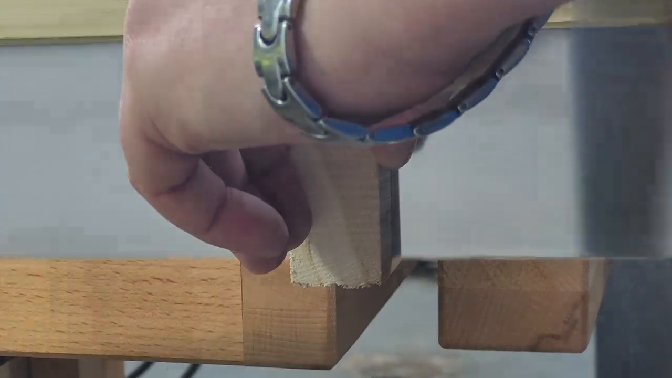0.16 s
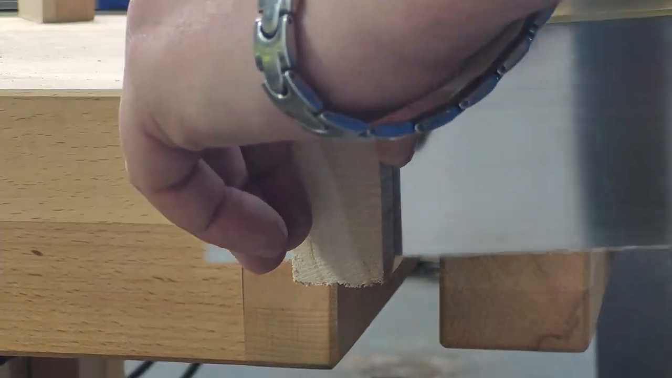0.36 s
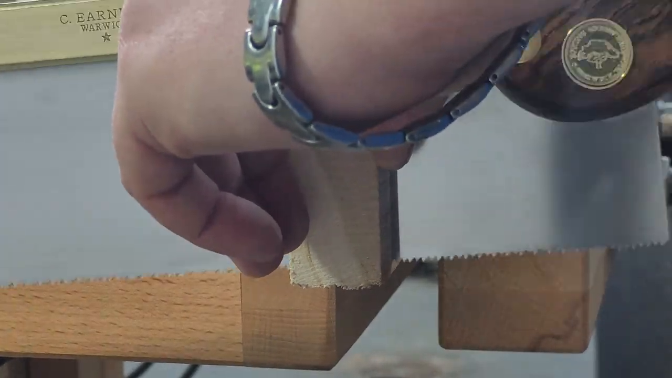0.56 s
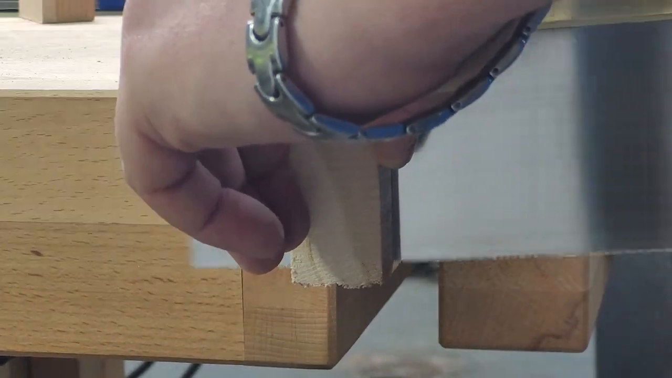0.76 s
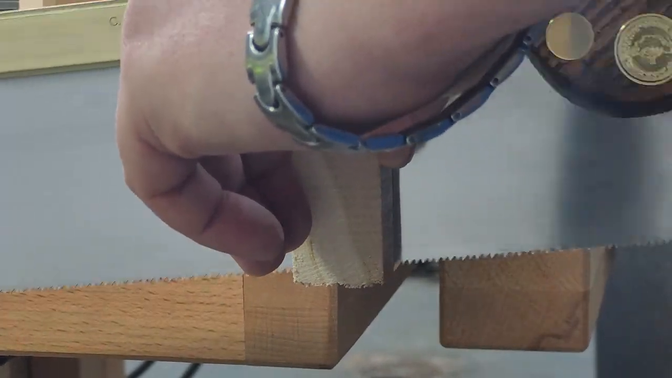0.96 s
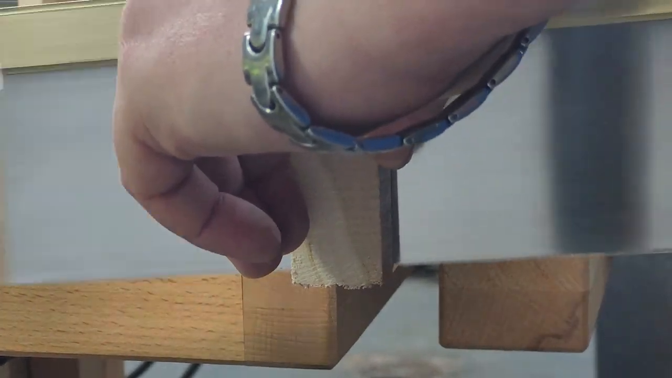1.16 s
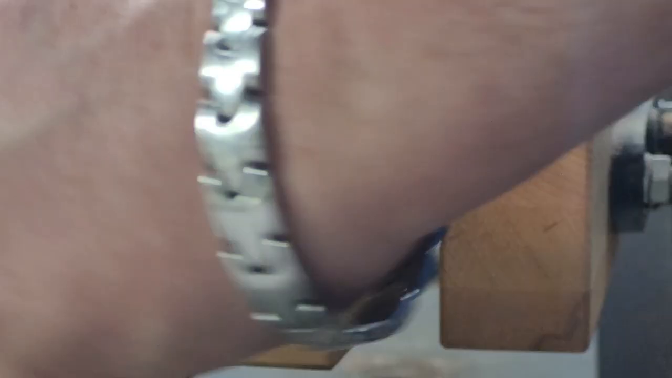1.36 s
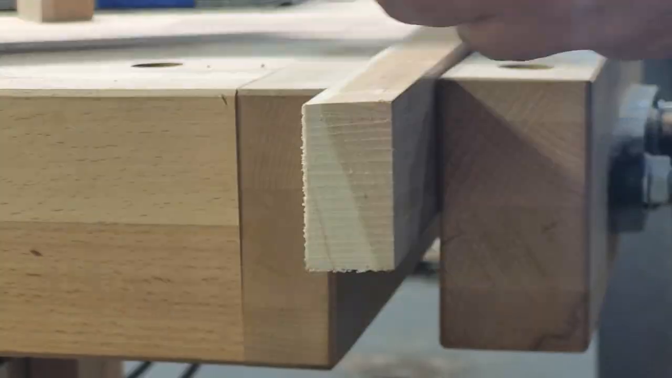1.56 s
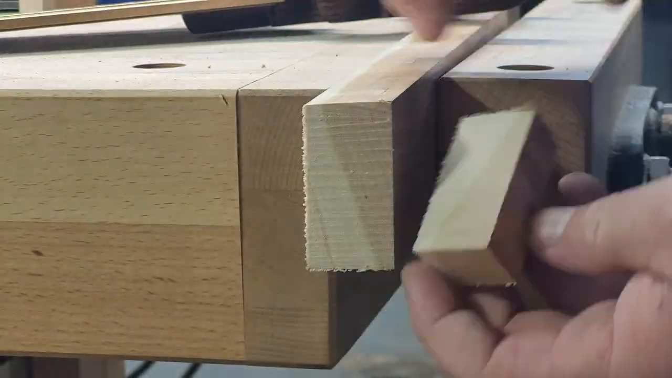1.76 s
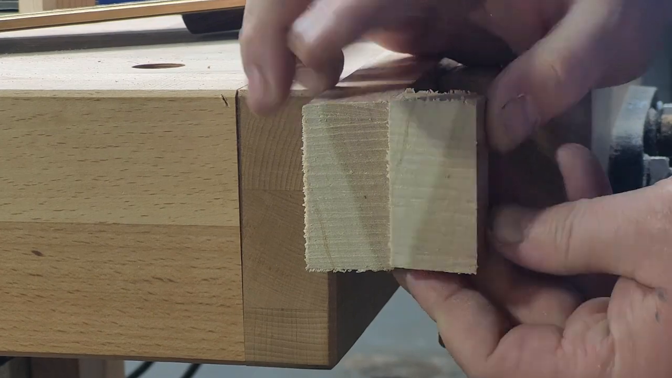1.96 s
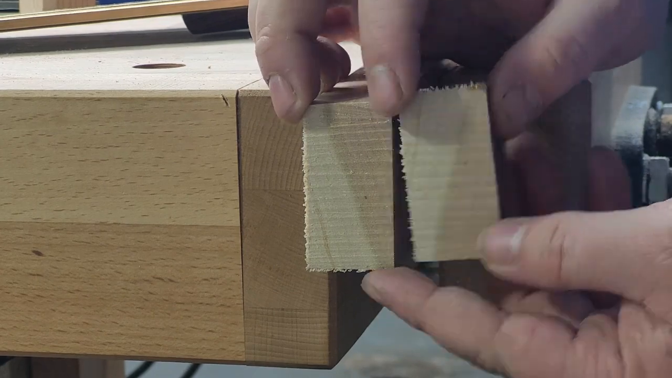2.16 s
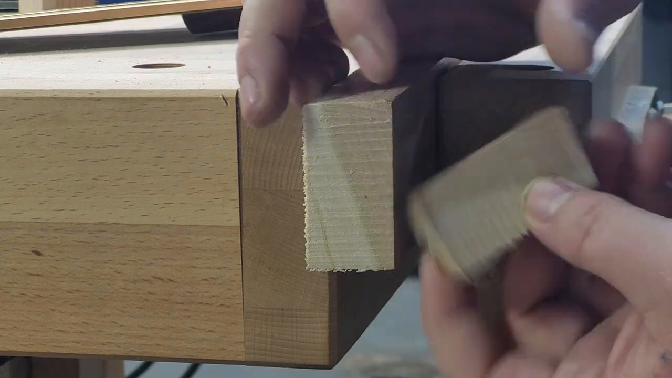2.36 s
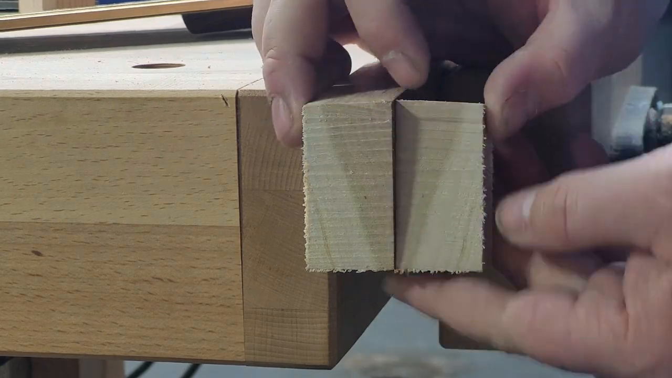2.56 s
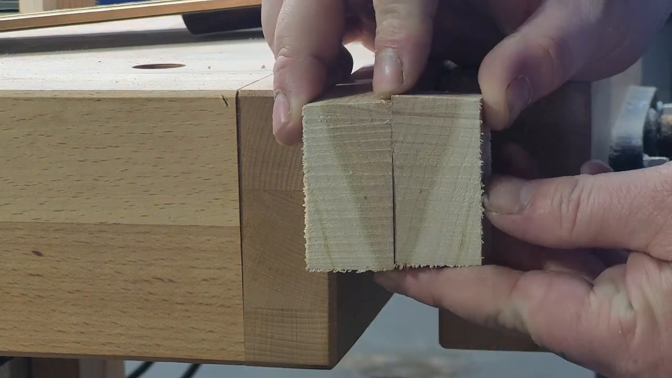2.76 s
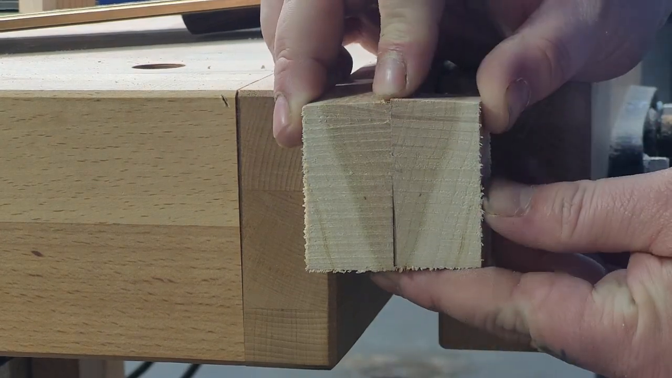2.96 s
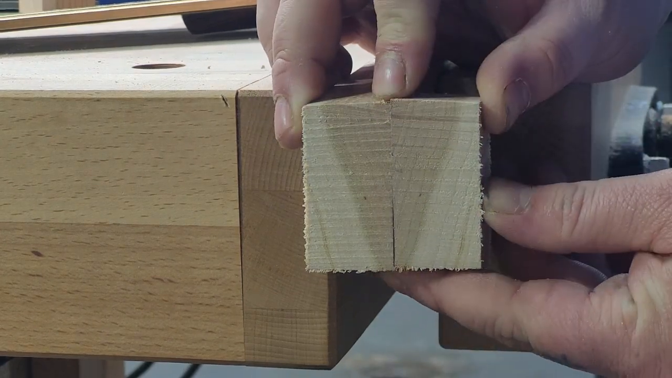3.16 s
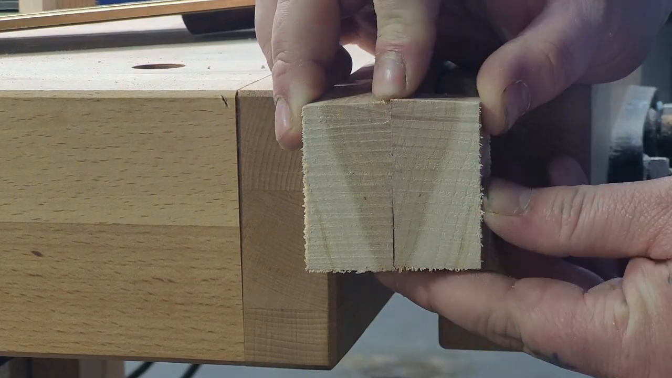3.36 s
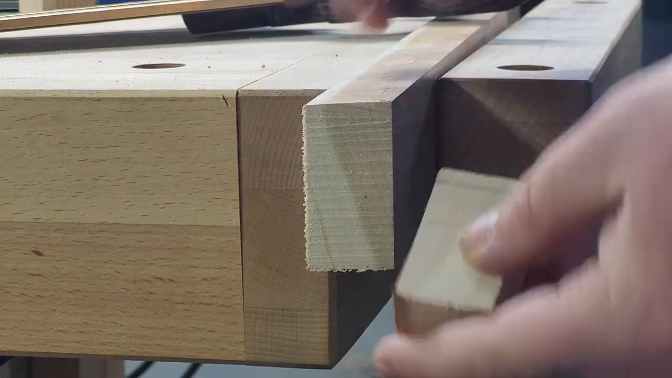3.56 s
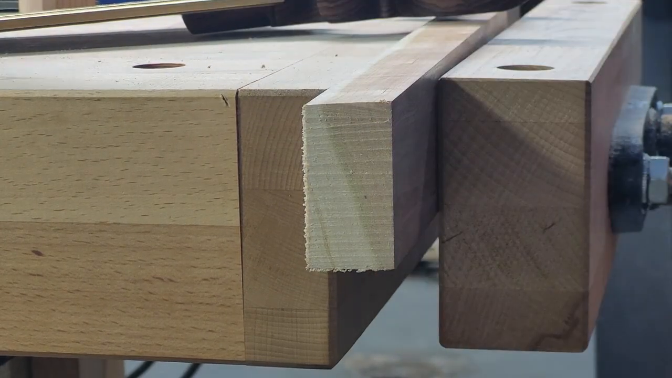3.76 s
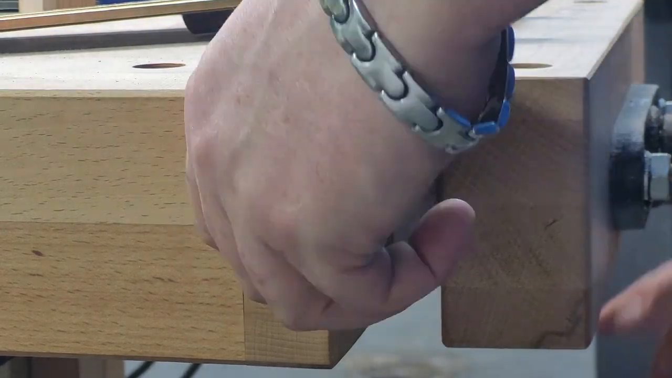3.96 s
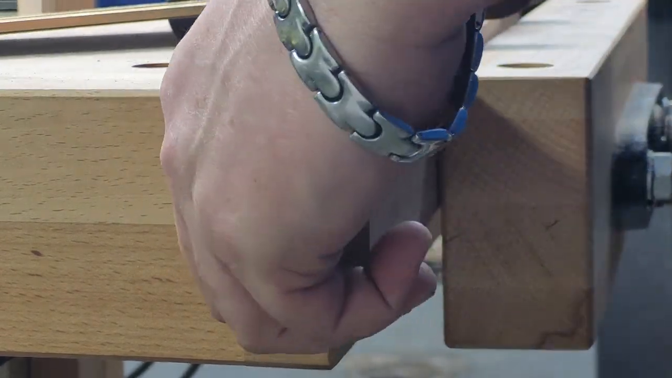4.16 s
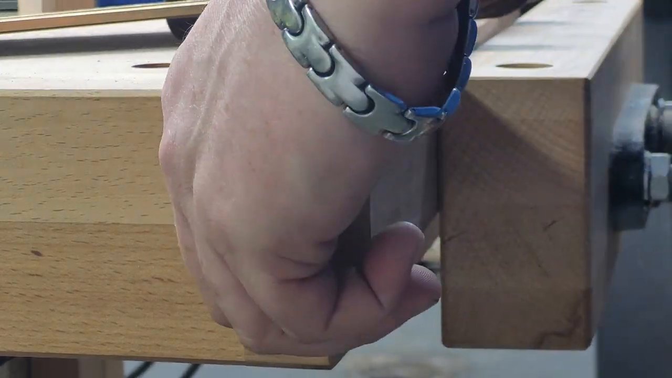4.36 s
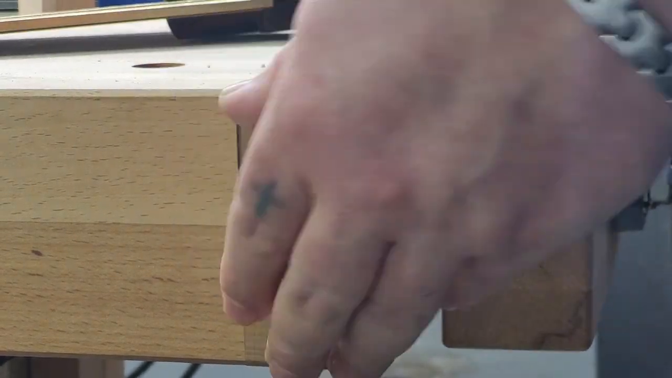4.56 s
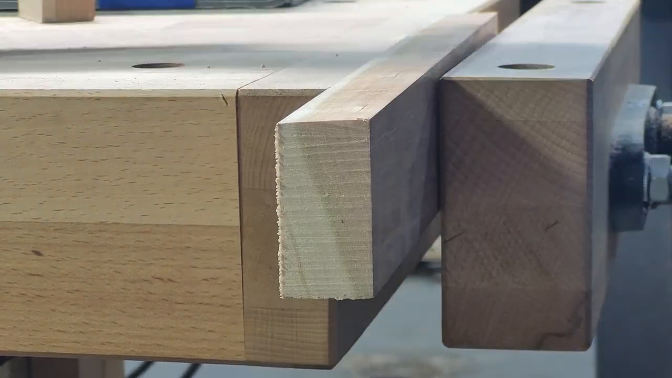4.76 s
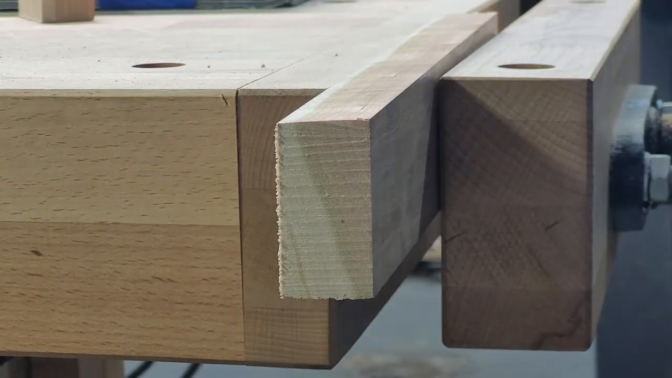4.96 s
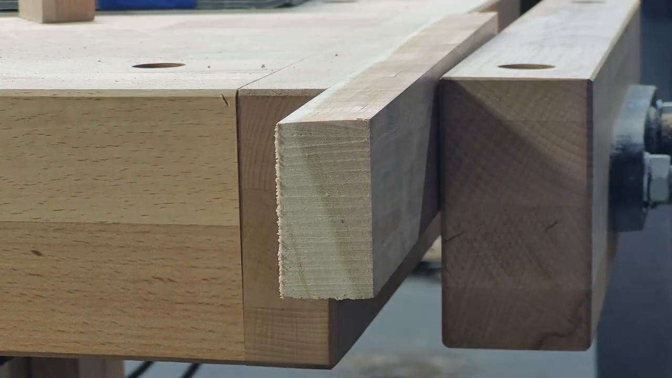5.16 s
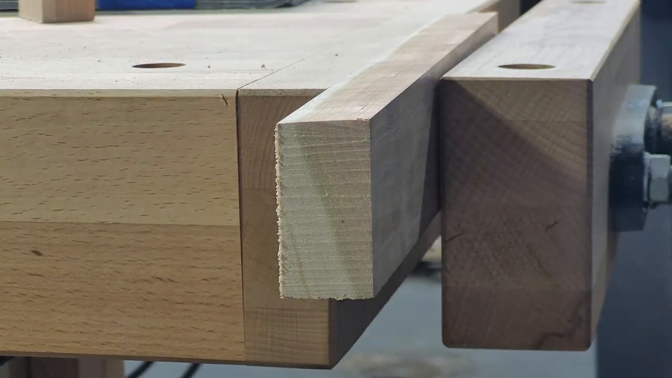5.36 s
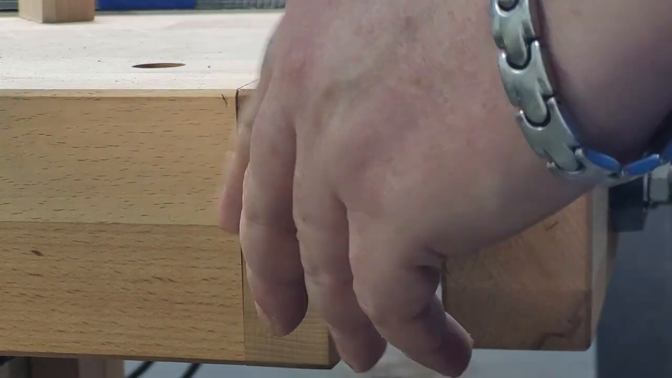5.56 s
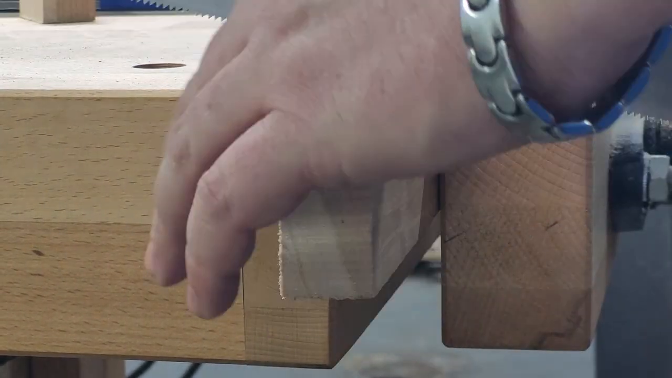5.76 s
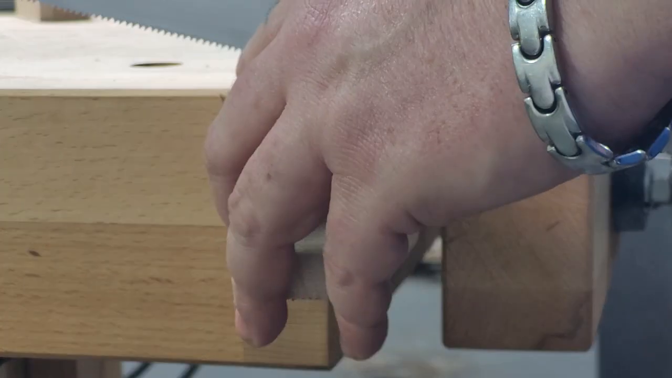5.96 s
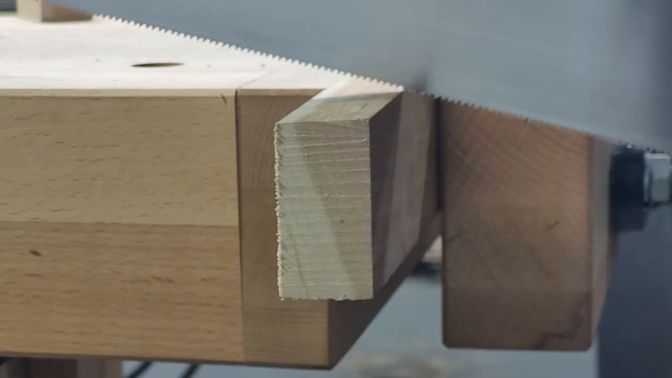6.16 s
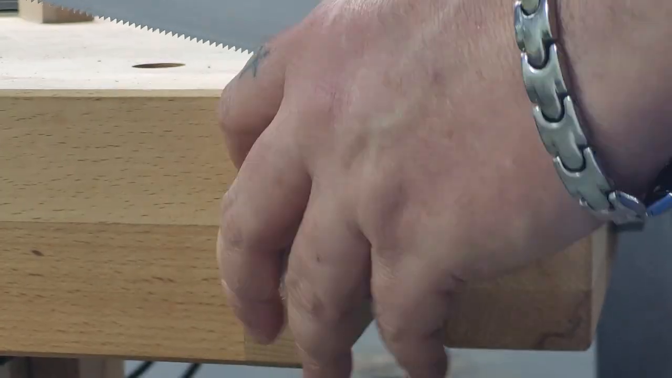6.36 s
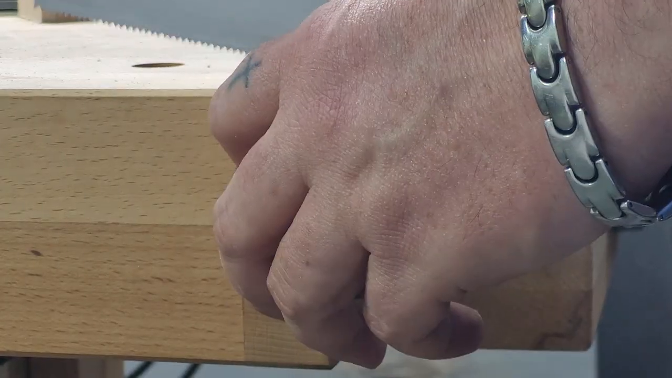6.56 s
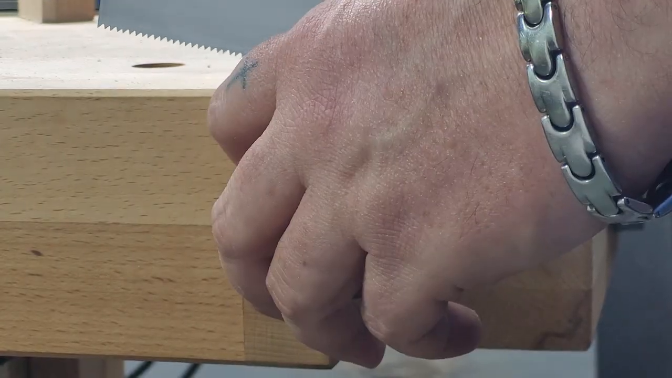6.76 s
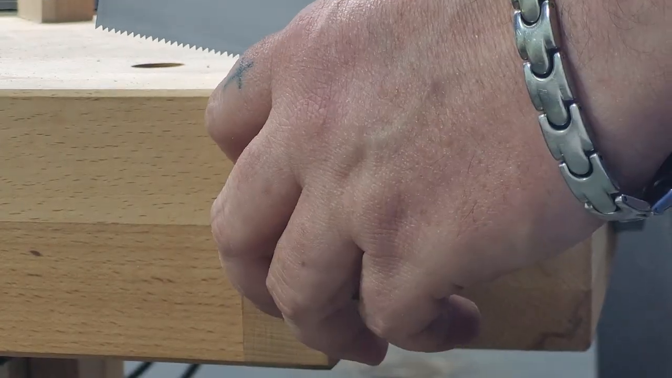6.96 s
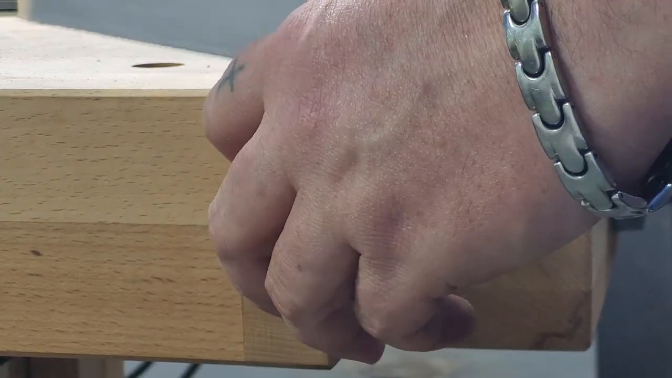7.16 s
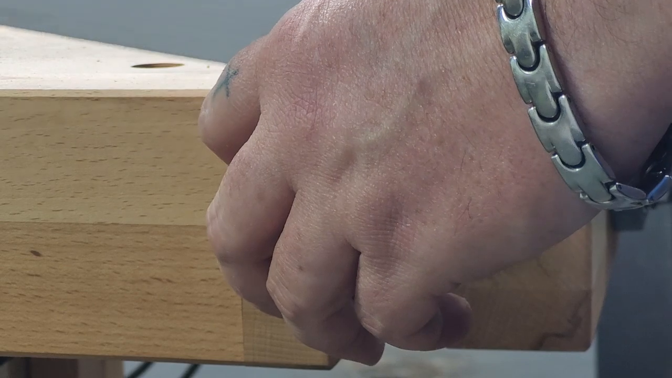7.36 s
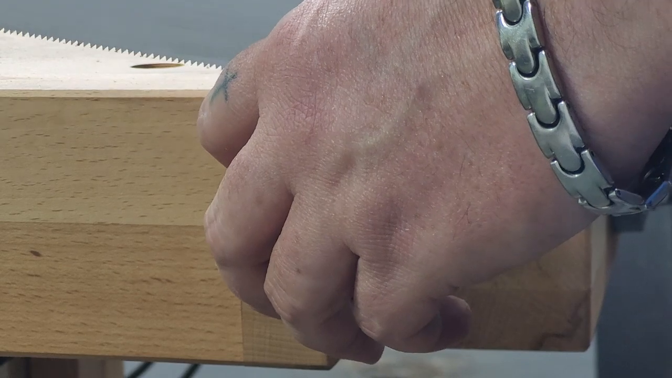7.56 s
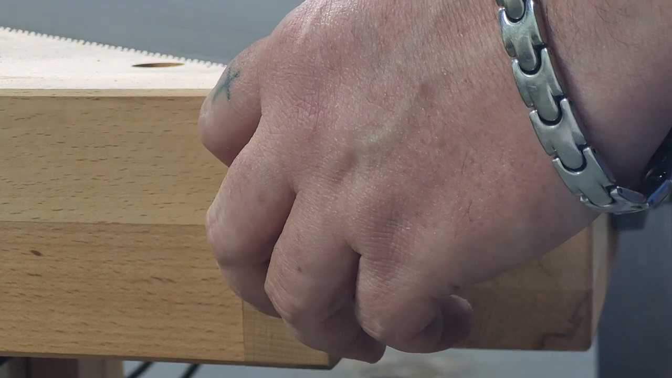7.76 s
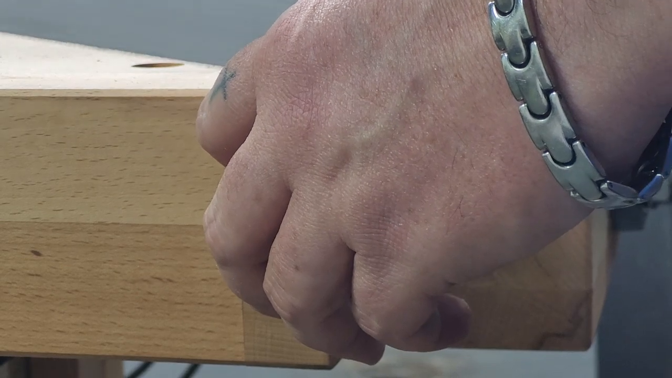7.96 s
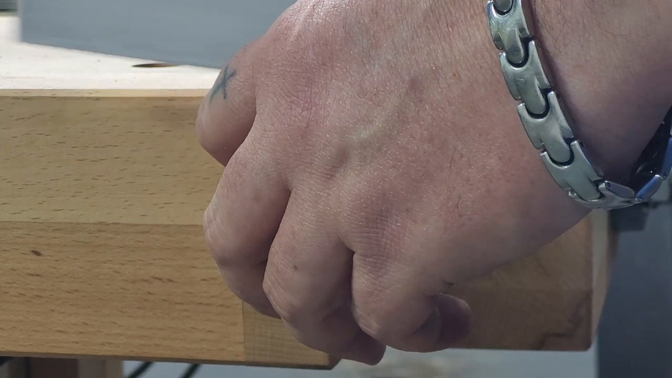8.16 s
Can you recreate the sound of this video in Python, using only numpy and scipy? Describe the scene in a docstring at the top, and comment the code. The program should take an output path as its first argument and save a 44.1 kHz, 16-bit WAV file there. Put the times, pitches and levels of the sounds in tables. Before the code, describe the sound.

A close stereo workshop scene, speeded up four times at first so everything is short and high. From 0 to 1.3 s a fine saw makes eight even, zipping rasps, about six per second, alternating in strength with tiny dips between. At 1.28 s comes the loudest event, a hard wooden clack with a brief steel ping. A sharp bright hiss bursts at 1.7 s. Then it is quiet: faint fan air with thin wavering whine, soft low hum swells around 2.4 and 3.65 s, tiny ticks at 1.9 and 2.5 s. Clusters of woody knocks and rubs follow at 3.8-4.6 s, then faint brushing, and more taps and blade scrapes at 5.7-6.7 s. At about 6.7 s speed becomes normal; the fan turns lower and darker, with faint dull thuds. A coarse saw rasps roughly from 7.2 to 7.7 s, then again from 7.9 s, cut off at 8.2 s.

```python
"""A workshop bench: a fine back saw finishes a small board in a vice; the offcut is handled, the board reclamped.
All this runs four times fast, so strokes, knocks and fan sound two octaves high; then time falls back to
normal and a coarser saw starts a new cut with two long strokes, the second cut short by the end.
Saws and rubbing parts are dense clicks through resonances, knocks and blade taps are ringing modes, and the
fan is coloured noise with wavering tones."""
import sys
import numpy as np
from scipy import signal
from scipy.fft import rfft, irfft, next_fast_len
from scipy.io import wavfile
from scipy.ndimage import uniform_filter1d

SR = 44100
rng = np.random.default_rng(int(sys.argv[2]) if len(sys.argv) > 2 else 0)


def dump(signal):
    """Clip the signal to [-1, 1] and save it as 16-bit WAV at the path in sys.argv[1]."""
    limited = np.clip(np.atleast_2d(signal).T, -1, 1)
    pcm = np.round(limited * 32767).astype(np.int16)
    wavfile.write(sys.argv[1], SR, pcm)


N = 362061
FAST, NORMAL_FROM_S = 4, 6.735   # time runs this many times fast, until this moment
SIZE = next_fast_len(N)
BIN_HZ = np.maximum(np.arange(SIZE // 2 + 1) * SR / SIZE, 1)

# Moments and levels that all fine strokes share
BITE_S, PEAK_S, SLACK_BEFORE_END_S, LAST_BEFORE_END_S = 0.016, 0.047, 0.048, 0.03
BITE_BELOW_PEAK_DB, TURN_DB = 3.5, -61   # the teeth catch just under the peak; the turn is nearly silent
# Treble fades as the blade slows: [added level/dB] at start, bite, peak, slack, last bite, end
DULLING_DB = (-2, -2, 2.5, -2, -8, -18.5)


def stroke(start, length, peak_db, slack_db, last_db, treble_db):
    """The teeth bite, peak, slacken, bite once more and stop for the turn."""
    moments = [0, BITE_S, PEAK_S, length - SLACK_BEFORE_END_S, length - LAST_BEFORE_END_S, length]
    level_db = [TURN_DB, peak_db - BITE_BELOW_PEAK_DB, peak_db, slack_db, last_db, TURN_DB]
    return np.transpose([start + np.array(moments), level_db, treble_db + np.array(DULLING_DB)])


# Fine saw, a row a stroke: [start t/s, length t/s, peak level/dB, slack level/dB, last bite level/dB,
# treble above level/dB before dulling]
FINE_STROKES = [(0.0, 0.14, -36.5, -39, -41, 1), (0.143, .16, -31.5, -35.5, -33, 2.5),
                (0.306, .15, -38, -41, -44, 4.5), (.455, 0.18, -28.5, -37.5, -36, 2.5),
                (0.639, .16, -36, -37, -41.5, -2), (0.801, 0.2137, -28.5, -42, -33.5, -1.5),
                (1.016, 0.16, -32.5, -38, -43, -6), (1.172, 0.15, -33.5, -37, -39, 2.5)]
# Spectrum of the bites: [f/Hz, relative level/dB]
FINE_COLOUR = [(40, -42), (300, -9), (450, -5.5), (640, 1), (950, -6.5), (1150, -12), (1420, -5.5),
               (2160, -13.5), (3740, -17), (6000, -15), (10000, -25), (15500, -29)]
# Resonances of board, vice and blade: [f/Hz, width f/Hz, lift level/dB]
FINE_BODY = [(672, 92, 8.5), (952, 66, 11), (1356, 120, 8), (1767, 83, 9), (2200, 59, 10.5),
             (2647, 190, 2.5), (3307, 170, 1.5), (4360, 150, 4.5), (5365, 130, 10), (6540, 400, -1.5),
             (7930, 440, 7), (9350, 340, 3), (10100, 400, 4.5), (11590, 280, -3.5)]
# Stereo likeness: [f/Hz, left-right likeness -1 to 1]
FINE_LIKENESS = [(60, 0.97), (300, 0.94), (1000, 1), (3000, 0.98), (7000, 0.29), (15000, 0.98)]
# Stereo lean: [f/Hz, left minus right level/dB]
FINE_LEAN = [(60, -10.5), (240, 0), (950, -1.0), (3770, 1), (15000, 2.5)]
# Near sources (both saws and the burst) arrive left first: [f/Hz, left phase lead/rad]
NEAR_LEAD = [(100, 0), (600, .1), (2000, .7), (5000, 1.2), (15000, 1.4)]


def fine_saw():
    """Short quick strokes: many small teeth bite through board, vice and blade resonances."""
    return rasp([stroke(*row) for row in FINE_STROKES], FINE_COLOUR, FINE_BODY,
                (FINE_LIKENESS, FINE_LEAN, NEAR_LEAD),
                bites_per_s=9000, uneven_db=-1.0, wander_db=5.5, split_hz=2440)


# Coarse saw, a list a stroke: [t/s, level/dB, treble above level/dB, bass above level/dB]
COARSE_STROKES = [
    [(7.16, -84, -3, -11), (7.216, -40.5, -5, -6), (7.248, -35, -6, 4.5), (7.286, -29, -9.5, -9.5),
     (7.522, -30.5, -12.5, -3.5), (7.636, -44, -10.5, 8.5), (7.74, -70, -15, 15), (7.85, -85, -36, 8)],
    [(7.85, -76, -23, -8), (7.91, -57.5, -5, 8), (8.012, -40.5, -7.5, 6.5), (8.028, -44, -5.5, 8),
     (8.084, -35.5, -12, 3.5), (8.154, -36, -10, 4.5), (8.2, -38.5, -5, 5), (8.21, -37, -8, 4)],
]
# Spectrum of the bites: [f/Hz, relative level/dB]
COARSE_COLOUR = [(20, -46), (40, -21.5), (100, -17.5), (152, -6), (195, -8), (349, -8.5), (482, -11),
                 (600, -11.5), (1050, -12), (1300, -17), (1950, -18), (2300, -20.5), (5000, -25.5),
                 (15500, -31.5)]
# Resonances of the cut: [f/Hz, width f/Hz, lift level/dB]
COARSE_BODY = [(68.9, 41, 10.5), (167, 17, 9.5), (231.2, 47, 8), (329, 28, 8.5), (581, 28, 9),
               (799.5, 13, 11.5), (1056, 24, 17), (1487, 51, 3.5), (1880, 92.2, 7), (2424, 160, 1.5),
               (3200, 400, 3.5), (5460, 530, 0), (8350, 550, 0)]
# Stereo likeness: [f/Hz, left-right likeness -1 to 1]
COARSE_LIKENESS = [(60, 1), (150, 0.99), (400, 0.71), (1200, 0.1), (4000, 0.25), (15000, 0.26)]
# Stereo lean: [f/Hz, left minus right level/dB]
COARSE_LEAN = [(60, -1.5), (240, -1), (950, 0), (3770, 3), (15000, 1)]


def coarse_saw():
    """Slower strokes at normal time: sparser, more uneven bites, with bass shaken out of the bench."""
    return rasp(COARSE_STROKES, COARSE_COLOUR, COARSE_BODY, (COARSE_LIKENESS, COARSE_LEAN, NEAR_LEAD),
                bites_per_s=6000, uneven_db=2.5, wander_db=4.5, split_hz=1390, bass_hz=446)


def rasp(strokes, colour, body, place, bites_per_s, uneven_db, wander_db, split_hz, bass_hz=None):
    """Dense uneven clicks, like teeth biting fibres; body resonances swell and fade as the contact moves."""
    bites = (rng.random((2, N)) < bites_per_s / SR) * rng.choice([-1, 1], (2, N))
    unevenness = np.minimum(rng.exponential(1, (2, N)), 5)
    bites = bites * amp(uneven_db * unevenness + 0.94 * drift(53))
    rung = bites.copy()
    for hz, width_hz, lift_db in body:
        r = np.exp(-np.pi * width_hz / SR)
        poles = [1, -2 * r * np.cos(2 * np.pi * hz / SR), r * r]
        peak = signal.lfilter([(1 - r * r) / 2, 0, (r * r - 1) / 2], poles, bites)
        rung += (amp(lift_db) - 1) * amp(wander_db * drift(11)) * peak
    sound = spread(rung, colour, *place)
    level_db, treble_db, *bass_db = in_time(strokes)
    out = amp(treble_db) * steady(edge(sound, split_hz, "high"))
    middle = edge(sound, split_hz, "low")
    if bass_hz:   # pressure on the work shakes the bench more or less
        out += amp(bass_db[0]) * steady(edge(middle, bass_hz, "low"))
        middle = edge(middle, bass_hz, "high")
    return amp(level_db) * (out + steady(middle))


# A sharp hissing burst: [t/s, level/dB, treble above level/dB]
BURST = [
    [(1.697, -47.5, 10), (1.701, -30.5, 12.5), (1.732, -30, 7), (1.76, -45.5, 4.5), (1.8, -60, -3),
     (1.93, -78, -1)],
]
# Spectrum of its clicks: [f/Hz, relative level/dB]
BURST_COLOUR = [(59, -60), (100, -38), (293, -10.5), (362, -16.5), (791, -13), (956, -4), (1260, -21.5),
                (1400, -8), (2580, -8.5), (2930, -14.5), (3690, -13), (4100, -15.5), (7100, -3.5),
                (15500, -21)]
# Resonances: [f/Hz, width f/Hz, lift level/dB]
BURST_BODY = [(980, 40, 6), (2260, 250, 2.5), (3450, 260, 10), (5560, 310, 10.5), (6940, 170, 13.5),
              (7970, 290, 11.5), (10500, 360, 4), (13360, 283, 8.5)]
# Stereo likeness: [f/Hz, left-right likeness -1 to 1]
BURST_LIKENESS = [(100, 0.65), (1000, 1), (4000, 0.58), (15000, 0.5)]
# Stereo lean: [f/Hz, left minus right level/dB]
BURST_LEAN = [(60, 2), (240, -0.5), (950, 0.5), (3770, 0), (15000, 1)]


def hissing_burst():
    """Very dense clicks fuse into one bright hiss with a quick onset."""
    return rasp(BURST, BURST_COLOUR, BURST_BODY, (BURST_LIKENESS, BURST_LEAN, NEAR_LEAD),
                bites_per_s=15000, uneven_db=1.5, wander_db=4, split_hz=2500)


# Wood knocked: [t/s, peak level/dB, centre of the ring f/Hz, treble above peak level/dB]
KNOCKS = [(1.275, -13, 640, -9.5), (1.29, -22, 625, -26), (1.304, -36, 696, -20), (1.316, -42, 980, 6),
          (1.934, -51, 1480, 7.5), (2.533, -48.5, 1400, -4), (3.81, -47.5, 1990, 7), (3.833, -52, 1480, 0),
          (3.873, -41, 727, -29), (3.897, -33, 920, -35), (3.915, -32, 265, -26), (4.259, -46, 931, 2),
          (4.276, -35, 1430, 0), (4.293, -34, 800, -28), (4.304, -37, 860, -5), (4.321, -28.5, 1510, -5.5),
          (4.51, -36.5, 2000, -5.5), (4.55, -31.5, 1490, -37), (4.583, -37, 890, -29),
          (5.692, -45, 563, -21), (6.011, -44.5, 920, -3.5), (6.216, -29.5, 614, -32),
          (6.492, -43.5, 885, -35), (6.601, -52, 619, -19), (6.624, -34, 500, -35), (6.637, -46, 600, -30),
          (6.821, -54, 150, -38.5), (6.917, -45, 156, -42), (6.965, -48.5, 149, -38)]
# Bench and board modes as heard at fast time: [f/Hz, relative level/dB, t60 t/s]
WOOD_MODES = [(198, -36, .04), (347, 0, .04), (506, -19, 0.084), (615, 18, 0.042), (884, 20, 0.013),
              (1120, 8, 0.032), (1478, 22, 0.04), (1736, 23.5, .02), (2173, 8.5, 0.039), (2960, -4, 0.014)]
KNOCK_T60_S, THINS_BELOW = 0.06, 0.67   # fall of the contact; share of the centre below which the ring thins


def knocks():
    """A short rough contact rings the modes near its centre most; its dry treble crack dies with it."""
    size = SR // 4
    out = np.zeros((2, N + SR))
    t = np.arange(size) / SR
    contact = (1 - np.exp(-t / 0.00064)) * amp(-60 * t / KNOCK_T60_S)
    scuffs = rng.standard_normal((len(KNOCKS), 2, size))
    strengths = rng.normal(0, 3, (len(KNOCKS), len(WOOD_MODES)))   # dB
    for (s, peak_db, centre_hz, treble_db), scuff, strength in zip(KNOCKS, scuffs, strengths):
        scuff = np.array([scuff[0] + 0.18 * scuff[1], scuff[0] - 0.74 * scuff[1]]) * contact
        pace = 1 if s < NORMAL_FROM_S else 1 / FAST   # modes ring lower and longer at normal time
        body = 0
        for (hz, db, t60), own_db in zip(WOOD_MODES, strength):
            off_centre_db = 10.3 * np.log2(hz * pace / centre_hz) ** 2
            body = body + amp(db + own_db - off_centre_db) * ring(scuff, hz * pace, t60 / pace)
        thinned = edge(body, THINS_BELOW * centre_hz, "high")
        crack = band(scuff, 2760, 5440)
        i = round(s * SR)
        for part, db in [(thinned, 0), (crack, treble_db)]:
            out[:, i:i + size] += amp(peak_db + db) * part / np.abs(part).max()
    return out[:, :N]


# Fine blade slips free and taps: [t/s, strike level/dB]
FINE_PINGS = [(1.271, -39.5), (1.3164, -72)]
# Modes of the fine blade: [f/Hz, relative level/dB, t60 t/s]
BLADE_MODES = [(4570, -2.5, 0.19), (5270, -7.5, 0.071), (6100, -4, 0.077), (6500, -0.5, 0.1),
               (7490, 16.5, 0.053), (7650, 6, 0.1), (9050, -16, 0.17), (10200, -9, 0.053),
               (11530, -10.5, 0.17)]


def blade_pings():
    """Each tap strikes every steel mode with a strength of its own; the ring leans a little left."""
    clicks = np.zeros((len(BLADE_MODES), N))
    at = [round(s * SR) for s, db in FINE_PINGS]
    own_db = rng.normal(0, 3.0, (len(at), len(BLADE_MODES))).T
    clicks[:, at] = amp(np.array(FINE_PINGS)[:, 1] + own_db)
    steel = sum(amp(db) * ring(c, hz, t60) for c, (hz, db, t60) in zip(clicks, BLADE_MODES))
    return steel * amp([[1.5], [-1.5]])


# Board and fingers sliding on the bench: [full at t/s, rise t/s, hold t/s, fall t/s, level/dB,
# treble above level/dB, bass above level/dB]
SLIDES = [(1.545, .04, 0.0046, .05, -65, -2.5, 0.5), (1.615, 0.018, 0, 0.045, -72, 16, 6),
          (2.032, .06, 0.12, .08, -67, -20, -12), (2.245, .03, 0, .04, -72, -3, -9),
          (2.314, 0.032, 0.091, 0.037, -68.5, -10.5, -5.5), (2.457, .03, 0.04, .04, -69, -11, -16),
          (2.665, .03, 0, .06, -66, -8, -9), (3.595, .05, 0, 0.062, -69, -3, -8),
          (3.81, 0.0063, 0.011, 0.086, -45, -24, -11), (3.877, .006, .02, 0.033, -56.5, -36, -4),
          (3.919, 0.0072, 0.0024, .06, -50.5, -3.5, 5), (3.945, .02, 0.031, .02, -58.5, -12, 8),
          (4.04, 0.062, 0.0082, 0.059, -46, -24, -17), (4.16, 0.035, 0.0044, 0.03, -56, -3, -11),
          (4.259, 0.0071, 0.025, .03, -48.5, -10.5, -20), (4.278, .01, 0.034, 0.023, -40, -32, -11.5),
          (4.309, 0.011, 0.022, 0.046, -39.5, -21, -5), (4.512, .005, 0.015, 0.025, -38.5, -26, -39),
          (4.55, 0.027, 0.002, 0.065, -35, -39, -13), (4.616, 0.013, 0.074, 0.033, -55.5, -19, -17.5),
          (4.695, .004, 0.014, 0.031, -66.5, 2, -20), (4.83, 0.017, 0, .04, -68, 7.5, -6),
          (4.876, 0.016, 0, .03, -62.5, -7, -23), (4.92, 0.02, 0, 0.029, -61, 3.5, -25),
          (5.531, .005, 0, .03, -74, 15, -12), (5.557, 0.033, 0.0037, 0.027, -77, 18, -16),
          (5.583, .01, 0.007, 0.043, -72, 10, -12), (5.664, 0.029, 0.013, .02, -70, 11, -8),
          (5.697, .012, 0.0023, 0.025, -74, 8, 3), (6.015, 0.014, 0, 0.03, -42.5, -31, -18),
          (6.213, 0.015, 0.021, 0.059, -54, -16, 10), (6.497, 0.0085, 0.0012, 0.042, -60, -20, 10),
          (6.603, 0.013, 0.019, 0.051, -55.5, -24, 8), (6.663, .012, 0.02, 0.047, -51.5, -20, -6),
          (6.708, .01, 0, 0.039, -55, -22, 4)]
# Spectrum of the rubbing: [f/Hz, relative level/dB]
SLIDE_COLOUR = [(60, -40), (150, -11), (300, -7), (600, -10.5), (1000, -10.5), (1600, -16), (2500, -7.5),
                (4000, -14), (7000, -13), (10000, -19), (15500, -24)]
# Resonances: [f/Hz, width f/Hz, lift level/dB]
SLIDE_BODY = [(334, 110, -3), (614.6, 320, 9), (939, 28, 11), (1410, 150, 12.5), (1927, 75, -2),
              (3326, 210, 1.5)]


def slides():
    """Rubbing is a run of small uneven catches whose resonances wander widely."""
    return rasp([swell(*row) for row in SLIDES], SLIDE_COLOUR, SLIDE_BODY, (FAN_LIKENESS, FAN_LEAN),
                bites_per_s=6400, uneven_db=3.5, wander_db=10.5, split_hz=3160, bass_hz=726)


# Coarse blade lifted, dragged and set on the wood: [full at t/s, rise t/s, hold t/s, fall t/s, level/dB]
BLADE_DRAGS = [(5.24, 0.026, 0.12, 0.028, -65.5), (5.755, .02, .01, .04, -80), (6.01, 0.008, 0, 0.046, -56),
               (6.208, .015, 0.017, 0.032, -56), (6.374, .015, .02, 0.017, -76.5), (6.49, .01, 0, .03, -75),
               (6.595, .012, 0.033, .03, -67), (6.664, .01, 0.015, .05, -64.5)]
# Spectrum of the drag: [f/Hz, relative level/dB]
DRAG_COLOUR = [(1000, -39.5), (3000, -4.5), (5500, -11.5), (7500, -6.5), (9000, -19), (12000, -17.5),
               (14300, -5.5), (15500, -8.5)]
# Resonances: [f/Hz, width f/Hz, lift level/dB]
DRAG_BODY = [(6860, 110, 6), (7700, 150, 14), (14300, 400, 4)]
DRAG_TREBLE_DB = -7   # above level


def blade_drags():
    """Teeth brush the wood lightly: thin bright catches with almost no low end."""
    return rasp([swell(*row, DRAG_TREBLE_DB) for row in BLADE_DRAGS], DRAG_COLOUR, DRAG_BODY,
                (FAN_LIKENESS, FAN_LEAN), bites_per_s=7000, uneven_db=1.5, wander_db=-4.0, split_hz=10420)


SWELL_DB = 27   # a swell rises from and falls to this far under its top


def swell(s, rise, hold, fall, level_db, *colour):
    """Level points of a sound that grows, holds and fades."""
    low_db = level_db - SWELL_DB
    return [(s - rise, low_db, *colour), (s, level_db, *colour),
            (s + hold, level_db, *colour), (s + hold + fall, low_db, *colour)]


# A low hum swells: [loudest at t/s, level/dB]
HUM_SWELLS = [(2.37, -61), (3.65, -63)]
HUM_HZ, HUM_RISE_S, HUM_FALL_S = 202, 0.22, 0.18


def hum():
    """A low sine with randomly drifting strength, heard as one narrow band of noise."""
    level_db, = in_time([swell(s, HUM_RISE_S, 0, HUM_FALL_S, db) for s, db in HUM_SWELLS])
    sine = np.sin(2 * np.pi * HUM_HZ * np.arange(N) / SR)
    return amp(level_db) * np.sqrt(2) * drift(12) * sine


# Fan levels: [t/s, air noise level/dB, tones level/dB]
FAN_LEVELS = [(0, -51, -81), (1.4, -63.5, -61.5), (2.3, -64.5, -61.5), (3.3, -65, -62), (4.6, -65, -62),
              (5.2, -68, -65), (6.7, -67, -65), (6.8, -66, -65.5), (8.21, -65.5, -64)]
# Motor tones as heard at fast time: [f/Hz, relative level/dB]
FAN_TONES = [(349.9, -75.5), (581.4, -81), (931.3, -73.5), (1394, -83), (1443, -79.5), (1631, -82.5),
             (1744, -84.5), (2040, -79), (2406, -70), (2519, -65.5), (2885, -77), (3004, -87.5),
             (4624, -87)]
# Air noise spectrum at fast time: [f/Hz, relative level/dB]
FAN_FAST_COLOUR = [(30, -32), (75, -33), (100, -20.5), (120, -5), (150, -13.5), (195, -0.5), (350, -8.5),
                   (639, -12.5), (921, -10), (2180, -9.5), (2490, -5), (2800, -10), (4090, -21.5),
                   (6000, -28.5), (15500, -42)]
# Air noise spectrum at normal time: [f/Hz, relative level/dB]
FAN_NORMAL_COLOUR = [(15, -35.5), (25, -15), (91, -4), (164, -11.5), (198, -25), (240, -7), (322, -11),
                     (421, -11.5), (567, -15), (614, -3.5), (848, -29), (4870, -43), (15500, -41)]
# Stereo likeness, shared by slides and drags: [f/Hz, left-right likeness -1 to 1]
FAN_LIKENESS = [(60, 1), (130, 0.81), (290, 0.82), (640, 0.98), (1410, 0.94), (3100, 0.17), (6820, -0.44),
                (15000, 0.08)]
# Stereo lean, shared by slides and drags: [f/Hz, left minus right level/dB]
FAN_LEAN = [(60, -7), (380, 0), (2380, -2), (15000, 2.5)]


def fan():
    """Air noise and wavering motor tones; at normal time the air darkens and the tones drop two octaves."""
    t = np.arange(N) / SR
    fast = t < NORMAL_FROM_S
    air = [rms_one(spread(rng.standard_normal((2, N)), colour, FAN_LIKENESS, FAN_LEAN))
           for colour in (FAN_FAST_COLOUR, FAN_NORMAL_COLOUR)]
    clock = np.where(fast, t, NORMAL_FROM_S + (t - NORMAL_FROM_S) / FAST)
    count = len(FAN_TONES)
    phases = rng.uniform(0, 2 * np.pi, (count, 1)) + rng.normal(0, 0.83, (count, 2))   # left and right
    tones = 0
    for (hz, db), phase in zip(FAN_TONES, phases):
        level = amp(db + 0.83 * drift(4))
        tones = tones + level * np.sin(2 * np.pi * hz * clock + phase[:, None] + 0.4 * drift(1.8))
    air_db, tones_db = in_time([FAN_LEVELS])
    return amp(air_db + 0.65 * drift(12)) * np.where(fast, *air) + amp(tones_db) * rms_one(tones)


ECHO_DB, ECHO_T60_S, ECHO_FROM_HZ = -3.5, 0.17, 826   # bench top and near walls; t60 at pace 1


def echoes(x, pace):
    """Dense early reflections, independent left and right; a faster pace shortens them."""
    t = np.arange(SR // 4) / SR
    tail = edge(rng.standard_normal((2, len(t))), ECHO_FROM_HZ, "high")
    tail = tail * amp(-60 * t * pace / ECHO_T60_S)
    tail = amp(ECHO_DB) * tail / np.sqrt(np.sum(tail ** 2, axis=1, keepdims=True))
    return x + signal.fftconvolve(x, tail, axes=1)[:, :N]


def spread(pair, colour, like, lean, lead=((20, 0), (20000, 0))):
    """Colours a direct and a diffuse signal and mixes them to left and right."""
    direct, diffuse = rfft(pair, SIZE) * amp(at_hz(colour))
    alike = np.clip(at_hz(like), -1, 1)
    side = np.array([[1], [-1]])
    shared = np.sqrt(1 + alike) * direct * np.exp(0.5j * side * at_hz(lead))
    opposed = np.sqrt(1 - alike) * diffuse * side
    return irfft((shared + opposed) * amp(side * at_hz(lean) / 2), SIZE)[:, :N]


def steady(x, over_s=0.062):
    """Unit power over every short stretch: resonances trade strength while the effort sets the level."""
    power = uniform_filter1d(np.mean(x ** 2, axis=0), round(over_s * SR))
    return x / np.sqrt(power + 1e-30)


def in_time(tables, rest_db=-120):
    """Tables as columns over time; the louder one sounds where they meet, the level rests between them."""
    out = np.zeros((len(tables[0][0]) - 1, N))
    out[0] = rest_db
    for table in tables:
        s, *columns = np.transpose(table)
        at = np.arange(max(int(s[0] * SR), 0), min(int(s[-1] * SR) + 1, N))
        values = np.array([np.interp(at / SR, s, c) for c in columns])
        out[:, at] = np.where(values[0] > out[0, at], values, out[:, at])
    return out


def at_hz(points):
    """A spectrum table read at every bin, straight between points on a log frequency scale."""
    hz, value = np.transpose(points)
    return np.interp(np.log(BIN_HZ), np.log(hz), value)


def drift(rate_hz):
    """Slow random wander of unit rms, made at a fortieth of the sample rate."""
    r = np.exp(-80 * np.pi * rate_hz / SR)
    noise = rng.standard_normal(N // 40 + 2002)
    slow = signal.lfilter([1], [1, -2 * r, r * r], noise)[2000:]   # settled part
    return np.interp(np.arange(N) / 40, np.arange(len(slow)), rms_one(slow))


def ring(x, hz, t60):
    """A decaying mode: a unit click sets a sine of height 1 ringing."""
    r, w = amp(-60 / (t60 * SR)), 2 * np.pi * hz / SR
    return signal.lfilter([0, np.sin(w)], [1, -2 * r * np.cos(w), r * r], x + 1e-18)


def band(x, low_hz, high_hz):
    """Band-pass."""
    return signal.sosfilt(signal.butter(2, [low_hz, high_hz], "band", fs=SR, output="sos"), x)


def edge(x, hz, kind):
    """Low- or high-pass."""
    return signal.sosfilt(signal.butter(4, hz, kind, fs=SR, output="sos"), x)


def amp(db):
    """Decibels to gain."""
    return 10 ** (np.asarray(db) / 20)


def rms_one(x):
    """Scales to unit power."""
    return x / np.sqrt(np.mean(x ** 2) + 1e-20)


def scene():
    """Saws and handling with their reflections, then dry knocks, hum and fan."""
    fast_work = fine_saw() + hissing_burst() + slides() + blade_drags() + blade_pings()
    work = echoes(edge(fast_work, 82, "high"), FAST) + echoes(coarse_saw(), 0.96)
    return work + knocks() + hum() + fan()


def record(dry):
    """A steep low-pass removes the top octave's upper part."""
    return signal.sosfilt(signal.cheby2(14, 70, 16300, fs=SR, output="sos"), dry)   # stopband from 16300 Hz


dry = scene()
out = record(dry)
dump(out)
```